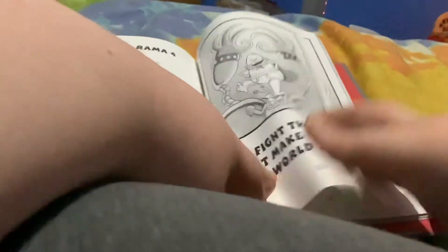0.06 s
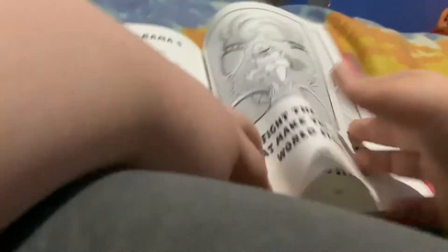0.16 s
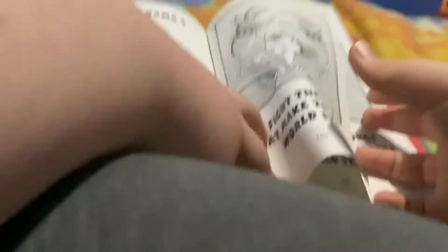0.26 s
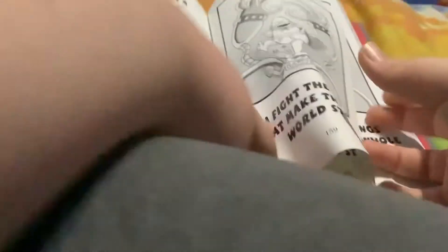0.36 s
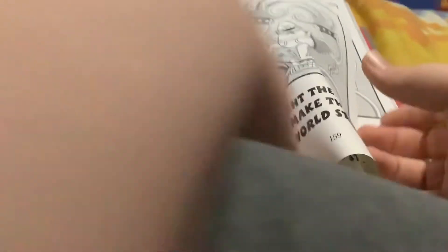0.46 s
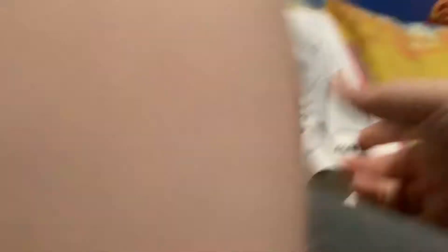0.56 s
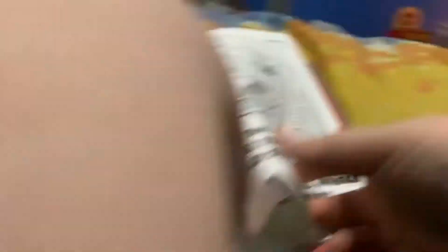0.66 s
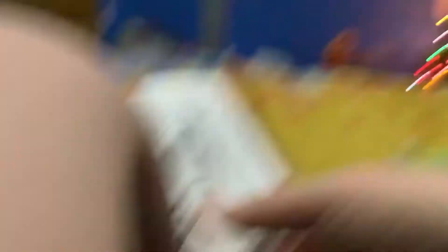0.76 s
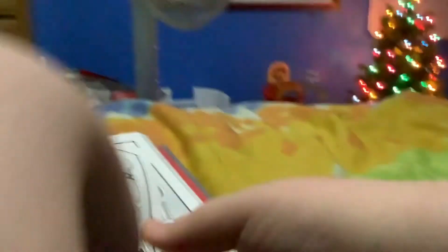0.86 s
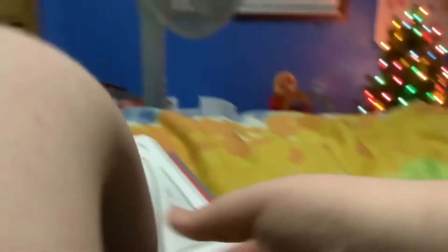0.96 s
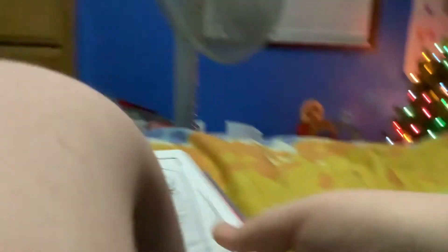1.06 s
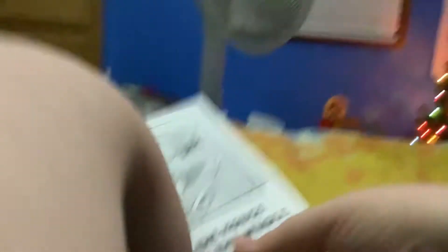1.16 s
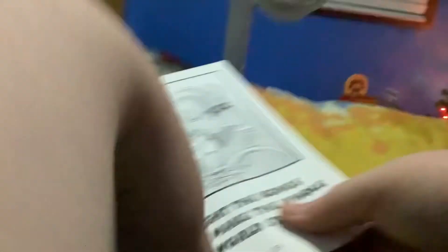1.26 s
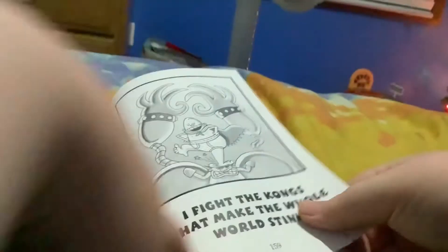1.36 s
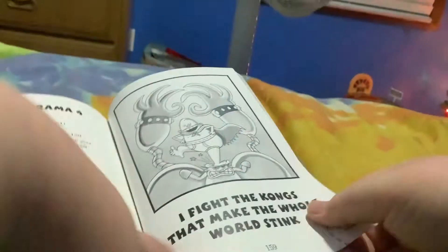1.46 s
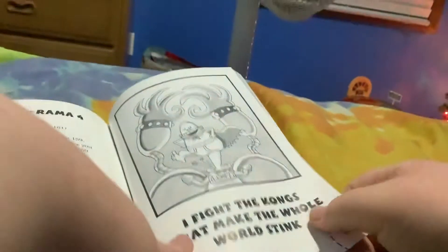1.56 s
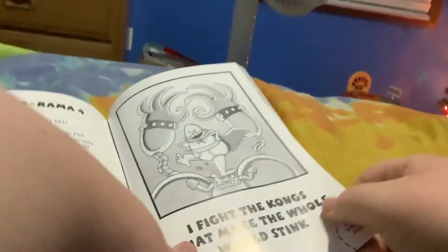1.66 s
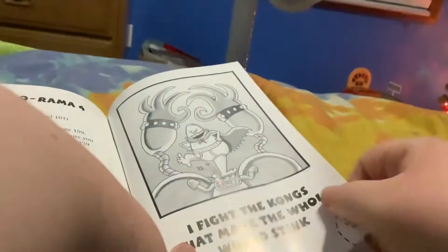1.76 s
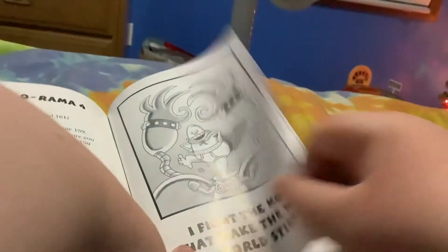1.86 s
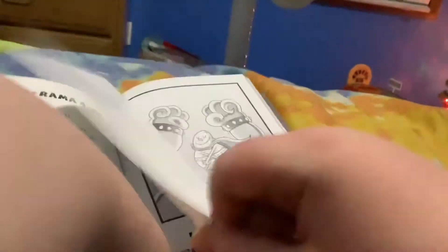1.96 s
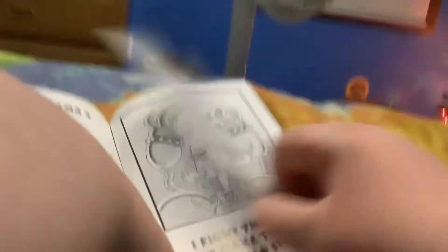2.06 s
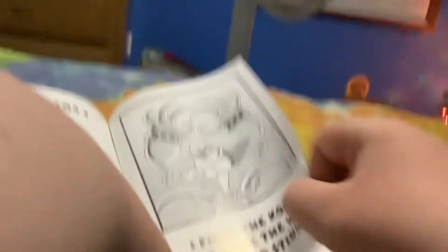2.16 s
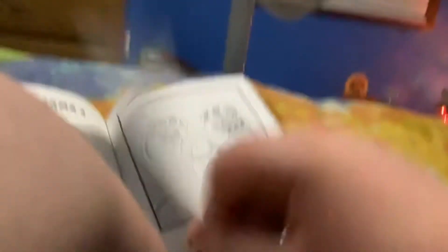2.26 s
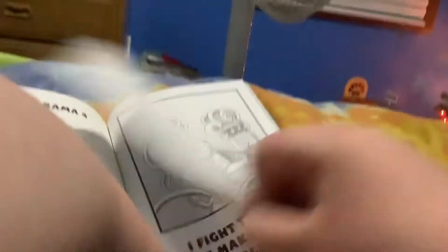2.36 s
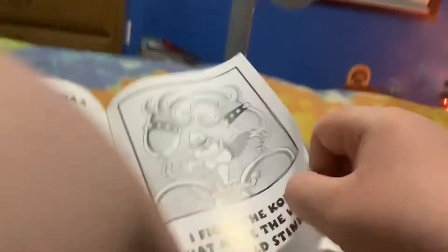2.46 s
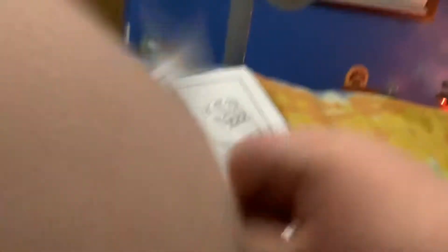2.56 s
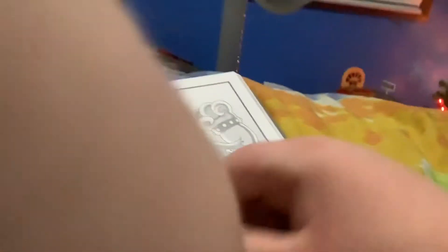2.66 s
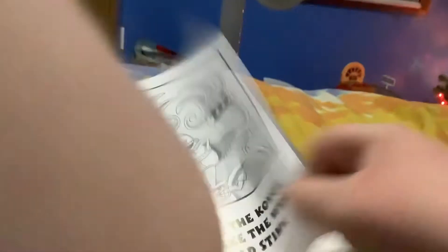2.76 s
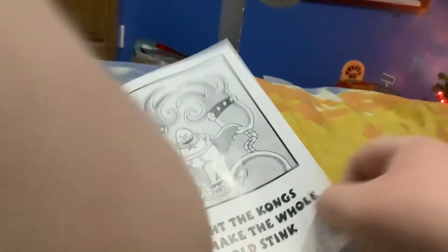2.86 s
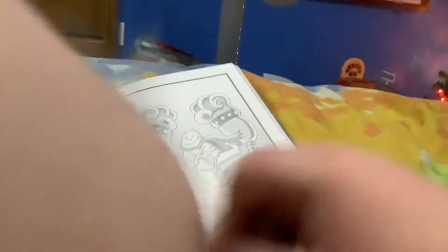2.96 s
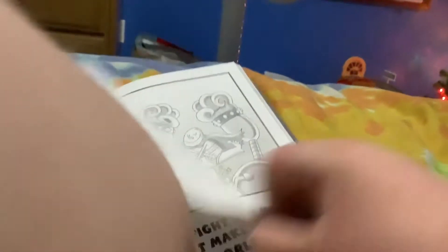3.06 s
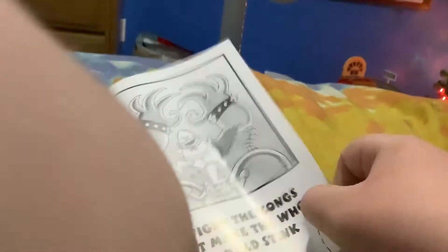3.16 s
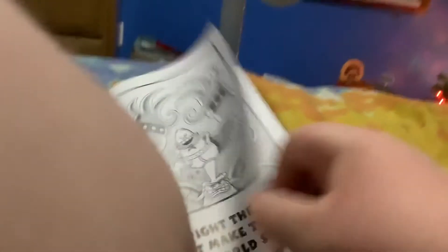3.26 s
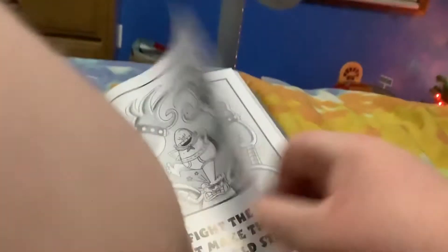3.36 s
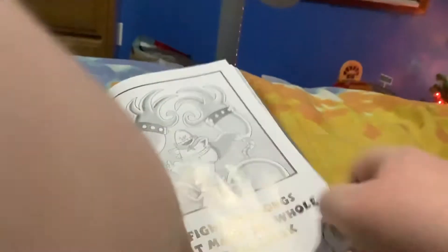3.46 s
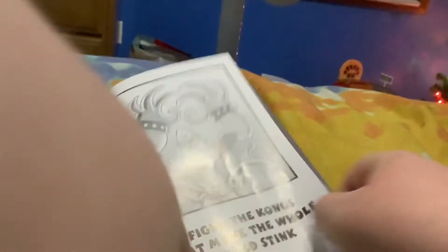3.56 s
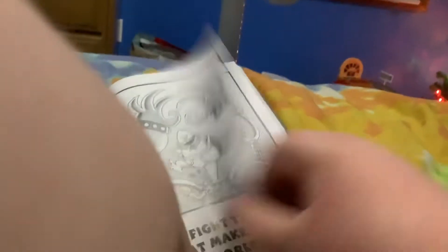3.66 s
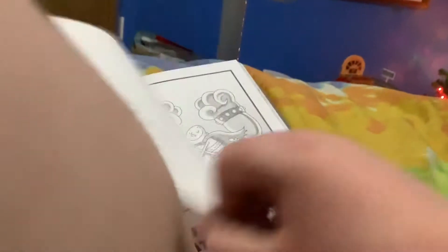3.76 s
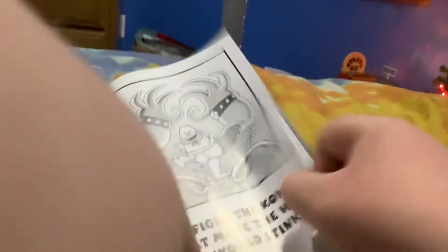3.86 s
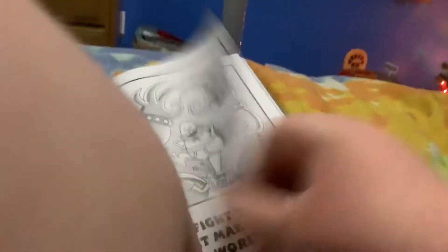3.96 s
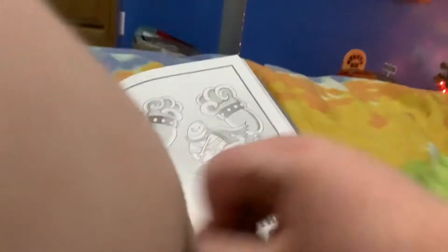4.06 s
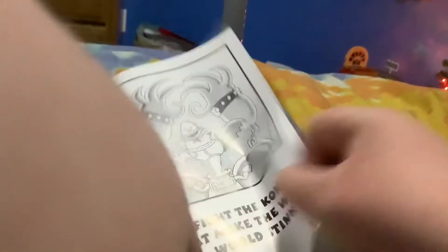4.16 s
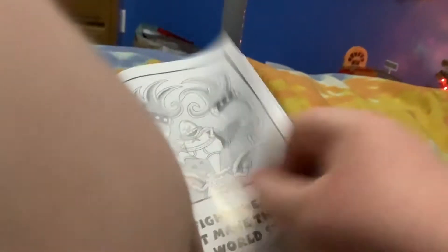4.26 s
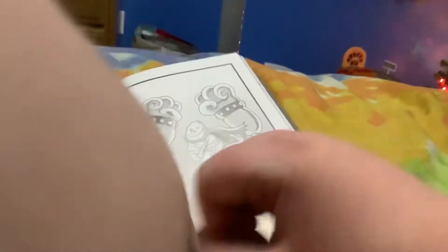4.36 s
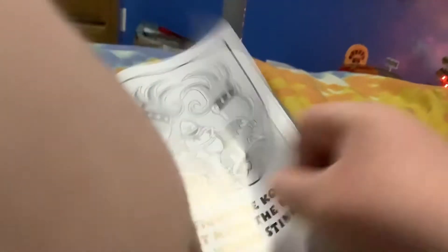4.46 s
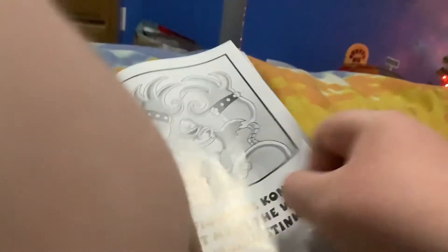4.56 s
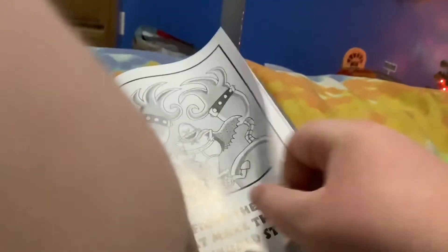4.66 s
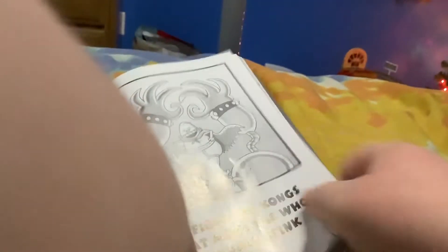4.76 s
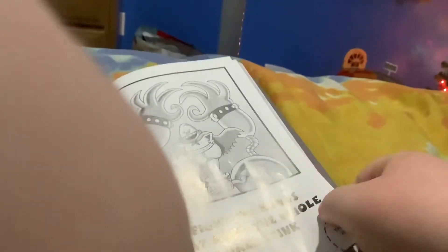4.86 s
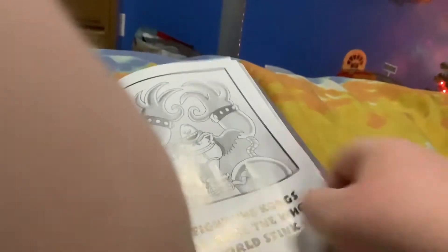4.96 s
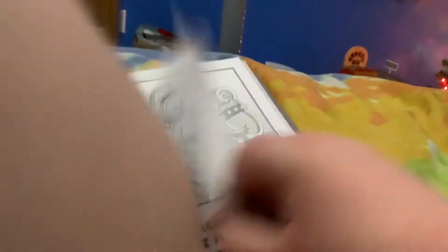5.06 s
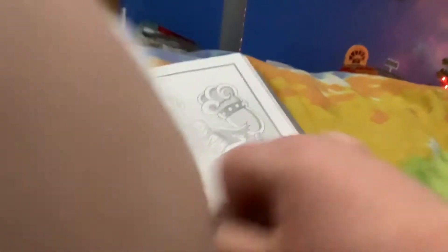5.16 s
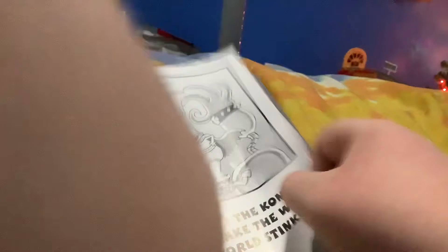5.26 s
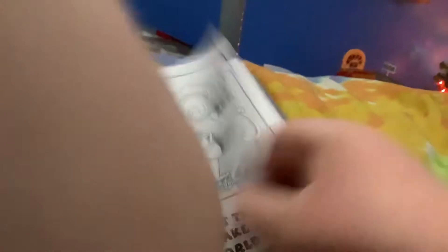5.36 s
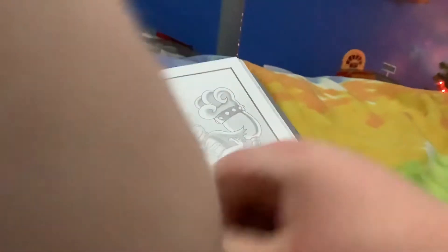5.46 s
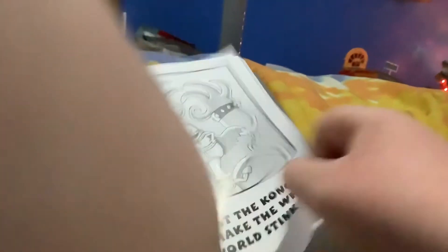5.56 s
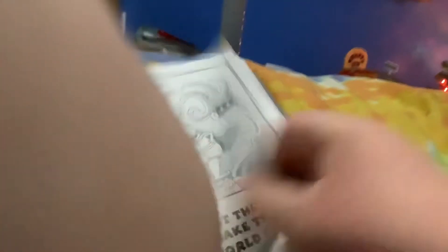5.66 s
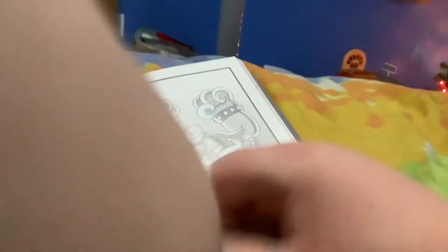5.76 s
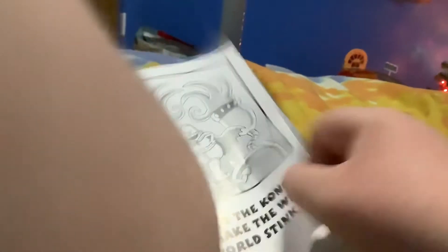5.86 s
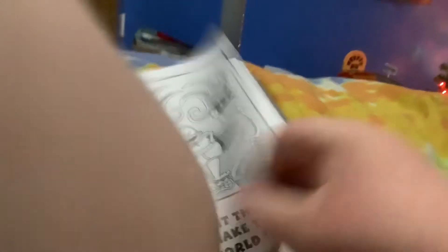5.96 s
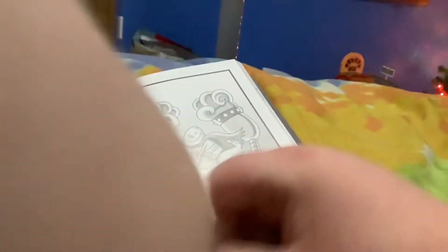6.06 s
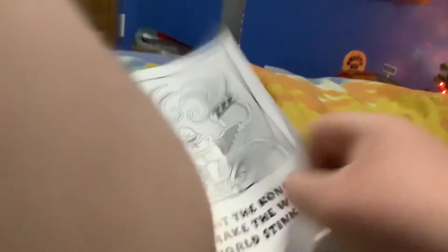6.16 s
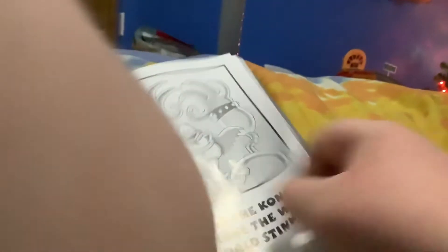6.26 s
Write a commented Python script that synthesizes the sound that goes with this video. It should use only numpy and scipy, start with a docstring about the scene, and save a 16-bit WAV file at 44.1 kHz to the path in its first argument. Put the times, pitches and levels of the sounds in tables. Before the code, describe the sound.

A close mono phone pickup in a small furnished room with a quiet, low background. Faint cloth rubbing and tiny bumps open it, then a hard knock at 0.5 s. Rubbing swells into the loudest moment, a cluster of blunt bumps with sharp ticks and low shuddering around 0.8 s. More scratchy rustle and softer thuds come at 1.0-1.25 s, fading to near quiet by 1.6. From 1.9 s a page is flicked to and fro: dry crackles and dull slaps on the book, several per second, until about 3.2. A lull follows, with a soft hollow page slide near 3.7 s. From 3.85 s, with one phone bump, the flicking returns stronger, with heavy flaps near 3.97, 4.26, 4.6 and 4.75. After about 5.1 s crisp cracks dominate over weaker flaps, with light paper rustling, ending in the brightest snap at 6.15 s and a short room tail.

```python
"""In a small furnished room, a paperback page is flicked to and fro by hand on a bed, close to a hand-held phone.
The sheet buckles with dry cracks (sprays of tiny slips) and slaps the book with dull flaps (short pulses).
Phone bumps are pulses too, most of them early; early rubbing on cloth and later on paper is shaped noise.
Once a page slides softly, as hollow noise. A noise tail adds the room to flaps and cracks, over a quiet floor."""
import sys
import numpy as np
from scipy import signal
from scipy.fft import rfft, irfft, next_fast_len
from scipy.io import wavfile
from scipy.ndimage import uniform_filter1d

SR = 44100
rng = np.random.default_rng(int(sys.argv[2]) if len(sys.argv) > 2 else 0)


def to_wav(sig):
    """Store sig (one row per channel, or 1-D mono) as 16-bit WAV at the path in sys.argv[1].

    Samples outside -1..1 are clipped; the rate is SR.
    """
    pcm = np.clip(np.atleast_2d(sig), -1, 1) * 32767
    pcm = np.round(pcm).astype(np.int16)
    wavfile.write(sys.argv[1], SR, pcm.T)  # frames by channels


N = 278712


def undb(db):
    """Turn a level in dB into a gain."""
    return 10 ** (np.asarray(db) / 20)


def band(x, lo_hz, hi_hz):
    """Keep one range of pitch and set its rms to 1."""
    y = signal.sosfilt(signal.butter(3, [lo_hz, hi_hz], "band", fs=SR, output="sos"), x)
    return y / np.std(y)


def curve(table, size):
    """Read a gain for every bin of a transform from (frequency [Hz], level [dB]) points."""
    hz, db = np.transpose(table)
    bin_hz = np.fft.rfftfreq(size, 1 / SR) + 1  # + 1 avoids the logarithm of 0
    return undb(np.interp(np.log(bin_hz), np.log(hz), db))


def colour(x, table):
    """Shape a sound by (frequency [Hz], level [dB]) points and set its rms to 1."""
    size = next_fast_len(len(x))
    y = irfft(rfft(x, size) * curve(table, size), size)[:len(x)]
    return y / np.std(y)


def walk(rate):
    """Random levels, each held for 1 / rate s, then smoothed into ramps."""
    hold = int(SR / rate)
    steps = np.repeat(rng.standard_normal(N // hold + 1), hold)
    return uniform_filter1d(steps, hold)[:N]


def add(out, s, x):
    """Mix a short sound in at time s."""
    start = int(s * SR)
    out[start:start + len(x)] += x[:N - start]


def bell(hz, centre_hz, octaves):
    """A bell-shaped hump of gain around one frequency."""
    return np.exp(-.5 * (np.log2(hz / centre_hz) / octaves) ** 2)


def blows(table, turns, air_db, top_hz, air_hz=114.7, size=4096):
    """Short pulses whose treble arrives first and bass later (delay = turns / Hz), with a puff of pushed air."""
    lead_s = .025  # room ahead of the hit for the early treble
    out = np.zeros(N)
    hz = np.fft.rfftfreq(size, 1 / SR) + 1
    air = undb(air_db) * bell(hz, air_hz, 0.62)
    tilt = np.sqrt(hz + hz * (hz / top_hz) ** 6)  # falls gently, then steeply above top_hz
    for s, db, centre_hz, breadth in table:
        shape = bell(hz, centre_hz, max(breadth, .2)) + air
        phase = turns * (np.log(hz / centre_hz) - hz / centre_hz) + hz * lead_s
        pulse = irfft(shape * np.exp(-2j * np.pi * phase) / tilt, size)
        add(out, s - lead_s, undb(db) * pulse / np.abs(pulse).max())
    return out


def cracks(table, after_db, length_ms=2., broad_db=0., breadth=0.6, spiky=0.55, after_s=0.023, size=8192):
    """A spray of tiny slips that dies in a few ms, then sparse after-crackle; also one smooth pulse of equal energy."""
    sprays, pulses = np.zeros(N), np.zeros(N)
    t = np.arange(size) / SR
    hz = np.fft.rfftfreq(size, 1 / SR) + 1
    draws = rng.standard_normal((len(table), 3, size))
    for (s, db, centre_hz, treble_db, *own_ms), (slips, spikes, gaps) in zip(table, draws):
        ms = own_ms[0] if own_ms else length_ms
        swell = (1 - np.exp(-t / 0.0012)) * np.exp(-t * 1000 / max(ms, .3))
        spray = slips * swell * np.exp(spiky * uniform_filter1d(spikes, size=9))
        # wide random level swings make the after-crackle sparse
        after = undb(after_db + 30 * uniform_filter1d(gaps, size=45))
        spray += slips * after * np.exp(-t / after_s)
        broad = curve([(500, -21), (1100, 1), (4500, -23.5), (7000, treble_db), (9500, treble_db),
                       (15000, treble_db - 38.5)], size)
        shape = undb(broad_db) * broad + bell(hz, centre_hz, breadth)
        # 44 samples (1 ms) later here, 1 ms earlier when added
        crack = np.roll(irfft(rfft(spray) * shape, size), 44)
        # the loudest 2 ms sets the level
        crack *= undb(db) / np.sqrt(4.77 * uniform_filter1d(crack ** 2, size=88).max())
        pulse = np.roll(irfft(shape, size), 44)
        add(sprays, s - .001, crack)
        add(pulses, s - .001, pulse * np.sqrt(np.sum(crack ** 2) / np.sum(pulse ** 2)))
    return sprays, pulses


def page_cracks():
    """The bending sheet buckles suddenly; returns the crack sprays and their smooth pulses."""
    # buckles of the sheet: (time [s], level [dB], centre [Hz], treble [dB])
    buckles = [(1.7821, -38.5, 2030, -8), (1.8722, -39, 1850, -20), (1.9004, -30, 2170, -11),
               (1.9164, -24.5, 3200, -13), (1.9282, -26, 3620, -22), (2.103, -24, 1630, -10),
               (2.122, -15.5, 3580, -40), (2.2562, -24, 3070, -14), (2.2803, -26.5, 1430, -19),
               (2.4034, -36.5, 2220, -24), (2.294, -31.5, 2180, -27), (2.4478, -37, 2030, -7),
               (2.4603, -12, 4440, -41), (2.5712, -27, 2230, -10), (2.73, -26, 2540, -12),
               (2.7964, -32.5, 2440, -20), (2.8502, -29, 2060, -16), (2.9512, -21, 2430, -8),
               (2.9682, -25, 2530, -27), (2.9856, -27.5, 2080, -19), (3.0075, -24, 2120, -13),
               (3.0548, -25, 2000, -47), (3.113, -31.5, 2130, -11), (3.1534, -20.5, 2380, -27),
               (3.1863, -22.5, 2670, -47), (3.4368, -28.5, 2530, -20), (3.5752, -42, 2850, -30),
               (3.7288, -28, 1900, -37), (3.7472, -24.5, 2470, -24), (3.8626, -15.5, 2440, -15),
               (3.8701, -15.5, 4120, -31), (3.9561, -26, 1530, -9), (4.0045, -15, 2150, -18),
               (4.1012, -24.5, 2900, -12), (4.1248, -25, 2410, -34), (4.1778, -16, 2570, -13),
               (4.1905, -18, 3430, -26), (4.2526, -27.5, 1910, -8), (4.3251, -15, 1930, -18.5),
               (4.3995, -30, 2050, -30), (4.4331, -24.5, 1920, -13), (4.4572, -29, 3960, -23),
               (4.4736, -19.5, 2660, -18.5), (4.5946, -13, 3670, -22), (4.7513, -22, 3350, -11),
               (4.967, -45.5, 1880, -38), (5.0988, -16.5, 2580, -17), (5.2503, -15.5, 3200, -12.5),
               (5.3239, -35, 2020, -29), (5.3586, -12.5, 4420, -14), (5.4059, -16.5, 2450, -15),
               (5.5071, -31, 1930, -38), (5.5449, -28, 1950, -26), (5.5666, -19.5, 3500, -16),
               (5.698, -34, 2260, -32), (5.71, -21, 2350, -23), (5.7929, -24.5, 2510, -28),
               (5.838, -25, 2550, -20), (5.8476, -17, 3320, -23), (5.9444, -11.5, 3530, -8.5),
               (6.0076, -17.5, 1880, -17), (6.0537, -24.5, 1970, -33), (6.0924, -31, 2270, -43),
               (6.1556, -5.5, 3170, -7)]
    return cracks(buckles, length_ms=1.96, after_db=-24.0)


def book(x, size=4096):
    """The slapped block of pages rings briefly, as a few dying sine waves."""
    # ringing tones of the page block: (frequency [Hz], level [dB], time to fall 60 dB [s])
    book_tones = [(352.6, -27.5, 0.24), (413.4, -19.5, 0.043), (582, -16.5, 0.02), (1388, -17.5, 0.032)]
    t = np.arange(size) / SR
    ring = np.zeros(size)
    for hz, db, t60 in book_tones:
        strength = undb(db) * 2 * np.pi * hz / SR
        ring += strength * np.sin(2 * np.pi * hz * t) * 1000 ** (-t / t60)
    return x + signal.fftconvolve(x, ring)[:N]


def page_flaps():
    """The page slaps the book: a dull pulse that pushes air and makes the page block ring."""
    # page slaps: (time [s], level [dB], centre [Hz], breadth [octaves])
    slaps = [(1.9199, -28.5, 670, 1), (2.1061, -17.5, 404, 0.64), (2.1234, -32, 370, 1),
             (2.2631, -32, 500, 1), (2.2819, -16.5, 730, 0.75), (2.4017, -27, 530, 0.46),
             (2.451, -14.5, 740, 0.49), (2.4611, -22.5, 406, 0.3), (2.5615, -31, 515, 0.32),
             (2.5713, -14, 520, 1), (2.5841, -22, 388, 0.17), (2.7151, -31.5, 530.0, 0.33),
             (2.7287, -17.5, 465, 1), (2.7358, -19, 410, 0.14), (2.7544, -27, 470.0, 0.79),
             (2.8511, -17, 660, 0.58), (2.9927, -27, 470.0, 0.59), (3.0052, -18, 686, 1),
             (3.014, -19, 428, 0.23), (3.1169, -16.5, 675, 0.77), (3.151, -24.5, 546, 0.77),
             (3.285, -39, 483, 0.39), (3.307, -39, 500, 0.93), (3.8651, -26, 820, 1), (3.9, -28, 880, 0.77),
             (3.94, -34, 520, 0.63), (3.9609, -21, 600, 1), (3.9681, -9, 540, 0.5), (4.094, -20, 950, 0.61),
             (4.1035, -16, 400, 0.52), (4.1527, -28.5, 318, 0.7), (4.1756, -22.5, 554, 0.45),
             (4.182, -24, 580, 0.37), (4.1916, -26, 544, 0.7), (4.254, -24, 900, .6),
             (4.2618, -6, 604, 0.67), (4.4251, -17, 800, 0.61), (4.4328, -12, 503, 0.66),
             (4.4753, -25, 600, 0.97), (4.579, -28.5, 594, 0.46), (4.595, -25.5, 850, 0.35),
             (4.602, -11.5, 530, 0.61), (4.7426, -27.5, 526, 0.42), (4.7497, -12.5, 583, 0.58),
             (5.1015, -26, 940, 1), (5.2534, -19, 710, 0.94), (5.3612, -23, 660, 1),
             (5.4073, -35, 1010, 0.46), (5.5487, -25.5, 550.0, 0.79), (5.7939, -27, 980, 0.45),
             (5.8497, -25, 565, 0.4), (5.8605, -24.5, 596, 0.18), (5.8708, -38, 550.0, 0.42),
             (5.9486, -24.5, 520, 0.66), (6.1619, -16.5, 503, 0.72), (6.1767, -24.5, 850, 1)]
    return book(blows(slaps, turns=0.53, air_db=-12.5, top_hz=1540.0))


def slide():
    """A page slides softly: a slow, grainy swell of hollow friction noise in two resonances."""
    peak_s, rise_s, fall_s, level_db = 3.68, 0.14, 0.044, -47
    t = np.arange(N) / SR - peak_s
    grain = undb(2.5 * walk(34))
    swell = np.exp(-.5 * (t / np.where(t < 0, rise_s, fall_s)) ** 2) * grain
    low, upper = (band(rng.standard_normal(N), hz - width_hz / 2, hz + width_hz / 2)
                  for hz, width_hz in ((566, 94), (1180, 640)))
    return undb(level_db) * swell * (low + undb(-7) * upper)


def hand():
    """How hard the hand rubs: the middle, bass and treble levels at every sample."""
    # rubbing on cloth: (time [s], middle level [dB], bass level [dB], treble level [dB])
    cloth_levels = [(0.0, -64.5, -59, -64), (0.2, -60.5, -55, -65), (0.35, -57, -53.5, -58.5),
                    (0.472, -47.5, -44.5, -41), (0.604, -45, -49.5, -49), (0.68, -42.5, -45, -47),
                    (0.725, -35.5, -41, -38), (0.76, -37, -32, -31.5), (0.81, -33.5, -23, -37),
                    (0.855, -53.5, -47, -58), (0.92, -56, -54, -62), (1.037, -39.5, -43.5, -52),
                    (1.095, -42, -43.5, -47.5), (1.145, -36, -28, -36.5), (1.2, -38.5, -37.5, -36.5),
                    (1.257, -41.5, -39.5, -47.5), (1.405, -47, -59, -43), (1.6, -58.5, -55, -60)]
    # rustling of the page: (time [s], middle level [dB], bass level [dB], treble level [dB])
    paper_levels = [(1.65, -61.5, -57.5, -70), (1.88, -60, -45.5, -65), (2.05, -58, -51.5, -66),
                    (2.26, -65, -47, -65), (2.4, -65, -51, -74), (2.52, -52, -44.5, -59),
                    (2.66, -48.5, -45, -55.5), (2.81, -70, -52.5, -70), (3.05, -54, -41, -70),
                    (3.35, -76, -57.5, -77), (3.55, -61.5, -54.5, -72), (3.68, -54.5, -47.5, -66),
                    (3.83, -59, -53.5, -72), (4.1, -51, -42.5, -67), (4.45, -54, -45, -78),
                    (4.85, -68, -60, -69), (4.97, -74, -54, -79), (5.08, -58.5, -53.5, -62),
                    (5.2, -55.5, -47.5, -74), (5.43, -42, -47.5, -76), (5.62, -60.5, -48, -86),
                    (6.0, -47, -44, -82), (6.32, -63, -51, -72)]
    s, *levels = np.vstack([cloth_levels, paper_levels]).T
    return [np.interp(np.arange(N) / SR, s, level) for level in levels]


def rub():
    """Cloth, later paper, slips as noise that flickers more when rubbed harder; each range follows the hand."""
    # tone of cloth: (frequency [Hz], level [dB per Hz])
    cloth_tone = [(18, -36), (30, 1), (106, -6.5), (232, -7.5), (279, 1.5), (362, -2.5), (496, 2.5),
                  (883, -5.5), (1340, -9), (2730, -15), (4610, -15.5), (11800, -9), (15800, -13)]
    # tone of paper: (frequency [Hz], level [dB per Hz])
    paper_tone = [(40, -11), (75, -3), (180, 1.5), (380, 3), (470, 6), (570, 1), (900, -3), (1350, -4.5),
                  (1700, -9.5), (2300, -8), (3600, -20), (4400, -14), (6200, -14.5), (15800, -14)]
    cloth_ends_s, thin_hiss_ends_s, thin_hiss_db = 1.62, .42, -50
    t = np.arange(N) / SR
    cloth = np.clip((cloth_ends_s - t) * 20, 0, 1)
    middle, bass, treble = hand()
    rumble = cloth * -5 + (1 - cloth) * -5  # dB against the bass, on cloth and on paper
    air = cloth * -3 + (1 - cloth) * -1  # dB against the treble, on cloth and on paper
    thin = undb(thin_hiss_db) * np.clip((thin_hiss_ends_s - t) * 10, 0, 1)  # a thin high hiss at the start
    ranges = [  # (lowest [Hz], highest [Hz], gain, flicker strength)
        (1200, 6200, undb(middle), 0.46),
        (55, 200, undb(bass + rumble), 7.1),
        (200, 1200, undb(bass), 7.2),
        (6900, 10600, undb(treble) + thin, 1.2),
        (10600, 15800, undb(treble + air), 0.94)]
    effort = np.clip((middle + 69.5) / 22, .4, 1.5)
    shared = 0.66 * walk(45) + walk(280)
    out = np.zeros(N)
    for lo_hz, hi_hz, gain, flicker in ranges:
        flicker_db = flicker * effort * (0.33 * shared + 0.52 * walk(150))
        slips = rng.standard_normal(N) * undb(flicker_db)
        on_cloth = band(colour(slips, cloth_tone), lo_hz, hi_hz)
        on_paper = band(colour(slips, paper_tone), lo_hz, hi_hz)
        out += (cloth * on_cloth + (1 - cloth) * on_paper) * gain
    return out


def crackle(count=420):
    """Small cracks at random times, which follow the strength of the rubbing at that moment."""
    over_db, spread_db, knee_db, slope = 6, 5, -40.5, 0.16  # the slope makes light rubbing crackle less
    centre_hz, spread_octaves, treble_db = 1920, 0.81, -10
    u = rng.random((count, 3))
    s = .01 + u[:, 0] * (N / SR - .02)
    level = hand()[0][(s * SR).astype(int)]
    db = level + slope * (level - knee_db) + over_db + spread_db * (2 * u[:, 1] - 1)
    hz = centre_hz * 2 ** (spread_octaves * (2 * u[:, 2] - 1))
    rows = np.transpose([s, db, hz, np.full(count, treble_db)])
    return cracks(rows, length_ms=6.5, after_db=-35, broad_db=-10, breadth=0.4)[0]


def shudders(count=3):
    """The phone shudders on after two hard bumps: each swing is later, lower and weaker."""
    # starts of the shudders: (time [s], level [dB], first swing [Hz])
    first_swings = [(.797, 3.5, 199), (0.831, -5.5, 144)]
    gap_s, stretch, sag, fade_db, octaves = 0.0124, 0.096, 0.735, -5, 0.78
    swings = []
    for s, db, hz in first_swings:
        for k in range(count):
            delay_s = k * gap_s * (1 + stretch * (k - 1))  # the second gap is longer than the first
            swings.append((s + delay_s, db + k * fade_db, hz * sag ** k, octaves))
    return swings


def phone_bumps():
    """Bumps against the phone itself, and its shudders: pulses with strongly delayed bass."""
    # bumps on the phone: (time [s], level [dB], centre [Hz], breadth [octaves])
    phone_hits = [(.16, -36.5, 86, 0.62), (.283, -38.5, 305, 1.6), (.296, -36, 382, 0.25),
                  (.399, -32.5, 388, 1.8), (.5072, -1, 429, 0.86), (.714, -26, 193, 1.7),
                  (.7865, -3.5, 422, 1.4), (.8185, 3, 384, 1.19), (1.13, -26.5, 200, 0.53),
                  (1.158, -17.5, 490, 2), (1.174, -9, 75, 0.47), (1.211, -10.5, 140, 1.02),
                  (3.916, -8.5, 238, 1.04)]
    return blows([*phone_hits, *shudders()], turns=1.232, air_db=-17.5, top_hz=3930.0)


def phone_ticks():
    """Cloth and fingers tick and scratch on the phone case: short sprays of slips."""
    # ticks and scratches: (time [s], level [dB], centre [Hz], treble [dB], length [ms])
    case_ticks = [(0.0634, -38.5, 1930, -15, 2.6), (0.3963, -35, 1700, -15, 1.8),
                  (0.4665, -20, 3060, -28, .7), (0.5037, -8, 2130, -13.5, 0.76),
                  (0.743, -17, 3700, -16, 2.), (0.7581, -14.5, 3700, -25, 3),
                  (0.7815, -12, 1580, -18, 0.64), (0.8144, -3.5, 3120, -2, 0.8),
                  (1.0031, -28, 2000, -11, 2.2), (1.065, -29, 2260, -23, 2.3), (1.0756, -20, 1510, -31, 10),
                  (1.105, -29, 1000, -30, 6.7), (1.1301, -13.5, 2320, -30, 2.3),
                  (1.1366, -18, 1500, -28, 5.6), (1.152, -21, 1200, -30, 4.3),
                  (1.1892, -20, 2140, -25, 5.5)]
    return cracks(case_ticks, after_db=-45, broad_db=5.5, breadth=0.57)[0]


def room(x, gap_s=0.0018, size=22050):
    """The room answers with noise in half-octave bands, each dying at its own rate, and a bunch of wall echoes."""
    # how fast the room goes quiet: (frequency [Hz], time to fall 60 dB [s])
    decay_times = [(100, 0.66), (400, 0.39), (1300, 0.56), (2500, 0.49), (6000, 0.62), (8000, 0.34),
                   (12000, 0.36)]
    # tone of the room: (frequency [Hz], level [dB])
    room_tone = [(60, -1), (130, -15), (230, 0.5), (380, 4.5), (480, 5.5), (580, -1), (900, 1.5),
                 (1150, -2.5), (1350, 6), (1650, 1), (2050, 7), (2400, 0.5), (6000, -3.5), (15000, 4.5)]
    wall_s, wall_db, wall_spread_s = .0195, 7, .0022  # echoes from the far wall
    t = np.arange(size) / SR
    tail = np.zeros(size)
    hz, t60 = np.transpose(decay_times)
    for f in 100 * 2 ** np.arange(0, 7.4, .5):
        part = band(rng.standard_normal(size), f / 2 ** .25, f * 2 ** .25) * np.sqrt(f)
        tail += part * 1000 ** (-t / np.interp(np.log(f), np.log(hz), t60))
    wall = 1 + undb(wall_db) * np.exp(-.5 * ((t - wall_s) / wall_spread_s) ** 2)
    start = np.clip(t / gap_s - .5, 0, 1)  # a short silence before the first echoes
    tail = colour(tail, room_tone) * start * wall
    return signal.fftconvolve(x, tail / np.sqrt(np.sum(tail ** 2)))[:N]


def room_floor():
    """The quiet background of the room: steady shaped noise that wavers very slightly."""
    # tone of the background: (frequency [Hz], level [dB per Hz])
    floor_tone = [(15, -46), (25, -22), (64, -0.5), (161, -10.5), (205, -13.5), (255, -3), (291, -9.5),
                  (414, -25), (3220, -44), (5820, -31), (15800, -45.5)]
    level_db = -54 + 0.39 * walk(8.4)
    return undb(level_db) * colour(rng.standard_normal(N), floor_tone)


def scene():
    """Flaps and cracks come through the air and the room; bumps and ticks go straight into the phone."""
    flaps = page_flaps()
    sprays, pulses = page_cracks()
    echoes = room(undb(-14.5) * flaps + undb(-10.5) * pulses + undb(-12.5) * sprays)
    page = flaps + sprays + echoes + slide()
    rubbing = rub() + crackle()
    phone = phone_bumps() + phone_ticks()
    return (page + rubbing + phone + room_floor())[None]


def record(dry):
    """The phone rounds the peaks, dulls the treble and cuts the deep bass and the top."""
    # tone of the phone, a step down in the treble: (frequency [Hz], level [dB])
    phone_tone = [(20, 0), (6100, 0), (6300, -7), (20000, -7)]
    size = next_fast_len(N)
    rounded = np.tanh(0.69 * dry) / 0.92
    x = irfft(rfft(rounded, size) * curve(phone_tone, size), size)[:, :N]
    x = signal.sosfilt(signal.butter(2, 42., "high", fs=SR, output="sos"), x)
    return signal.sosfilt(signal.ellip(10, .2, 80, 15850, fs=SR, output="sos"), x)


dry = scene()
out = record(dry)
to_wav(out)
```